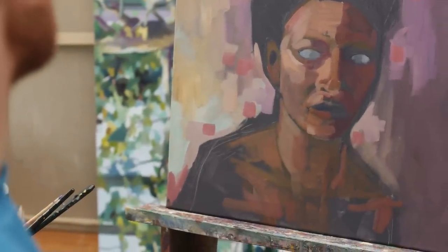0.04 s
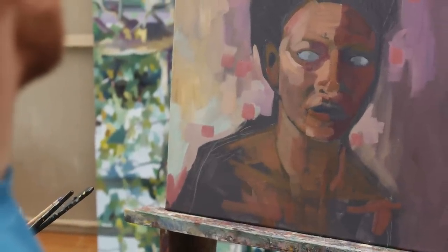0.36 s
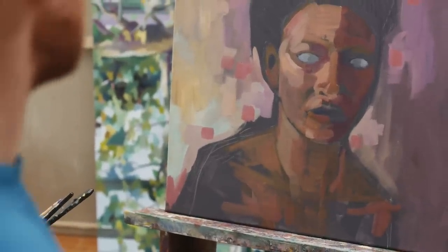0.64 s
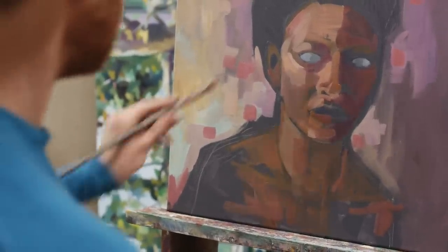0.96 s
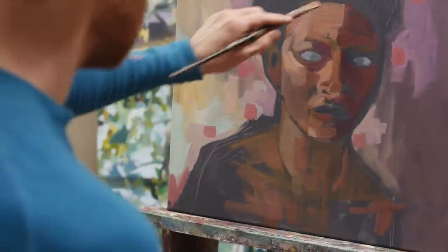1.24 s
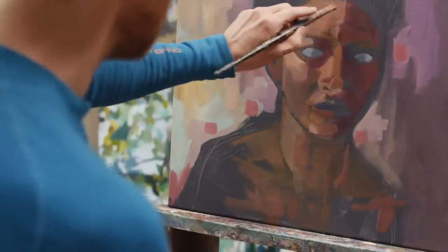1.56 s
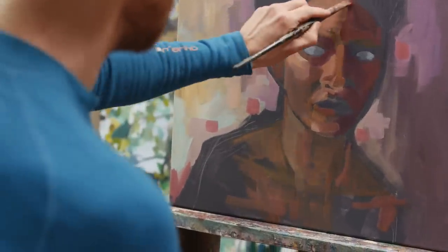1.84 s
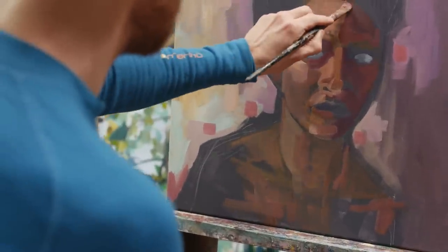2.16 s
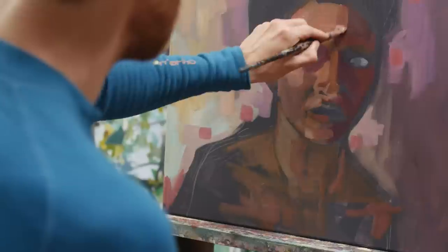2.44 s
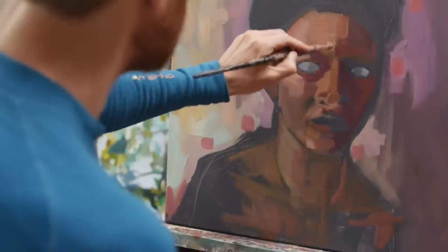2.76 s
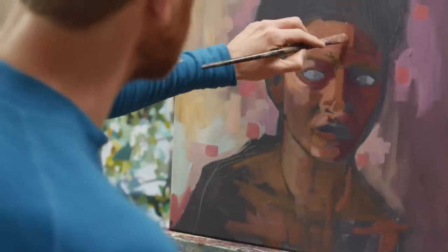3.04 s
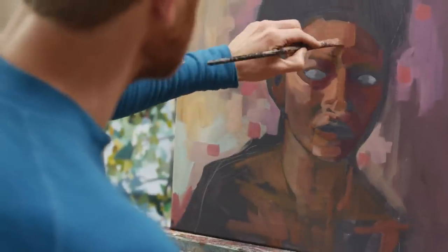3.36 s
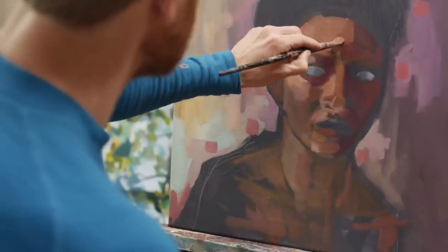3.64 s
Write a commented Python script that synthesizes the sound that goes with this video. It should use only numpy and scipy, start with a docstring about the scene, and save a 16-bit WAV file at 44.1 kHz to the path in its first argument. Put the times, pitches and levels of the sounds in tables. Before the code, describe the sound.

Quick paired knocks of a brush being rinsed in a jar fade into a small slosh and a cloth rustle. Very soft bristle strokes on canvas follow in a quiet room, with a few easel bumps and low microphone rumble.

```python
"""A painter knocks a brush to and fro in a rinsing jar, a hard knock and a lighter one each time:
each impact excites damped modes of handle and jar, and the table thumps beneath them.
The liquid slops and a sleeve rustles as the arm lifts to the easel, with a few dull bumps.
Then soft bristle strokes cross the canvas, sounding by friction, and a dull background noise swells.
From the lift onward low rumbles buffet the two microphones unevenly; the small room stays quiet."""
import sys
import numpy as np
from scipy import signal
from scipy.fft import rfft, irfft
from scipy.io import wavfile

SR = 44100
rng = np.random.default_rng(int(sys.argv[2]) if len(sys.argv) > 2 else 0)


def waveform_to_disk(signal):
    """Save audio, clipped to [-1, 1], as 16-bit WAV at the path in sys.argv[1]."""
    frames = np.transpose(np.atleast_2d(signal))
    scaled = np.clip(frames, -1, 1) * 32767
    samples = np.round(scaled).astype(np.int16)
    wavfile.write(sys.argv[1], SR, samples)


N = 171990


def amp(db):
    """Amplitude ratio of a level in decibels."""
    return 10 ** (np.asarray(db) / 20)


def unit_rms(x):
    """Normalisation to unit root-mean-square amplitude."""
    return x / np.sqrt(np.mean(x ** 2) + 1e-20)


def at_frequency(points, hz):
    """Interpolation of a table on a logarithmic frequency axis."""
    f, value = np.transpose(points)
    return np.interp(np.log(hz + 1), np.log(f + 1), value)


def envelope(points):
    """Amplitude envelope interpolated in decibels, silent outside the table's span."""
    times, db = np.transpose(points)
    return amp(np.interp(np.arange(N) / SR, times, db, left=-200, right=-200))


def add(mix, start, sound):
    """Superposition of a sound on the mix, from a start time in seconds."""
    part = mix[..., max(round(start * SR), 0):][..., :sound.shape[-1]]
    part += sound[..., :part.shape[-1]]


def shaped(x, spectrum):
    """Zero-phase filtering by a spectrum table."""
    n = x.shape[-1]
    return irfft(rfft(x) * amp(at_frequency(spectrum, np.fft.rfftfreq(n, 1 / SR))), n)


def impulse(spectrum, size=4096):
    """Minimum-phase impulse response with the given spectrum, peak 1."""
    log_gain = np.log(amp(at_frequency(spectrum, abs(np.fft.fftfreq(size, 1 / SR)))))
    response = np.exp(np.conj(signal.hilbert(log_gain)))
    pulse = np.fft.ifft(response).real[:size // 2]
    return pulse / abs(pulse).max()


def mode(hz, bandwidth_hz):
    """Free vibration of a damped oscillator, peak 1."""
    t = np.arange(SR // 5) / SR
    ring = np.exp(-np.pi * bandwidth_hz * t) * np.sin(2 * np.pi * hz * t)
    return ring / abs(ring).max()


def shot_noise(events_per_s=5000):
    """Shot noise: dense, independent impulses of random size."""
    return rng.standard_normal(N) * (rng.random(N) < events_per_s / SR)


def grainy_noise(spectrum):
    """Filtered shot noise at unit rms."""
    return unit_rms(shaped(shot_noise(), spectrum))


# Hard knocks on the jar's near side and light return knocks on its far side
# (t/s, jar level/dB, thump level/dB, tick level/dB, tick f/Hz, contact cutoff f/Hz)
NEAR_KNOCKS = [(.1488, -16, -27, -23.5, 4200, 5950), (.4240, -12.5, -25.5, -22.5, 5000, 5100),
               (.6878, -11.5, -25.5, -20.5, 5330, 5760), (.9411, -21, -29, -32.5, 4900, 1200),
               (1.2801, -29, -32.5, -36.5, 4490, 1580)]
FAR_KNOCKS = [(.2543, -16.5, -30, -40.5, 3770, 9500), (.5419, -17.5, -30, -38, 4030, 9450),
              (.8101, -15, -31, -35.5, 3660, 9500), (1.0893, -28, -38.5, -41, 3970, 3000)]
# Spectrum of each side's heavily damped ring (f/Hz, level/dB)
NEAR_SPECTRUM = [(80, -34.5), (200, -7), (260, -1.5), (350, -7), (420, -14), (560, 3), (780, -1.5),
                 (1000, -2), (1350, -13), (1650, -8), (2350, -34.5), (3200, -28), (8500, -32.5),
                 (15000, -65)]
FAR_SPECTRUM = [(80, -35.5), (200, -10.5), (300, 2.5), (420, -15), (700, -4.5), (950, 3), (1300, -3.5),
                (1650, -2.5), (2100, -17), (6500, -13.5), (15000, -48)]
# Faint, lingering modes of the jar (f/Hz, level/dB re the knock, T60/s)
LINGERING_MODES = [(259.4, -31.5, 0.27), (584, -59, 0.16), (646, -33, 0.11), (777, -36.5, 0.27)]
# Modes of the handle (ratio to the tick frequency, level/dB, bandwidth/Hz)
HANDLE_MODES = [(1, 0, 1250), (1.68, -6, 900), (2.4, -19, 1200)]
# Spectrum of the handle's chatter on the rim (f/Hz, level/dB)
CHATTER_SPECTRUM = [(500, -20), (2500, -2), (6000, 0), (15000, 2)]


def jar_knocks(knocks, jar_spectrum, chatter_re_tick_db, chatter_decay_s):
    """Impact excitation: the handle ticks and chatters on the rim, the jar rings, the table thumps."""
    thump_hz, thump_peak_s = 120.2, 0.0061
    tick_lag_s, thump_lag_s = 0.0003, 0.0023
    out, t = np.zeros(N), np.arange(SR // 10) / SR
    jar = impulse(jar_spectrum)
    linger = sum(amp(db) * mode(hz, np.log(1000) / np.pi / t60) for hz, db, t60 in LINGERING_MODES)
    rise = t / thump_peak_s
    thump = (rise * np.exp(1 - rise)) ** 2 * np.sin(2 * np.pi * thump_hz * t)
    for start, jar_db, thump_db, tick_db, tick_hz, cutoff_hz in knocks:
        tick = sum((-1) ** i * amp(db) * mode(tick_hz * ratio, bandwidth)
                   for i, (ratio, db, bandwidth) in enumerate(HANDLE_MODES))
        chatter = unit_rms(shaped(rng.standard_normal(len(t)), CHATTER_SPECTRUM))
        chatter *= np.exp(-t / chatter_decay_s)
        contact = signal.butter(2, cutoff_hz, fs=SR)  # a softer contact passes less treble
        add(out, start, amp(jar_db) * signal.lfilter(*contact, jar))
        add(out, start, amp(jar_db) * linger)
        add(out, start, amp(tick_db + chatter_re_tick_db) * signal.lfilter(*contact, chatter))
        add(out, start + tick_lag_s, amp(tick_db) * tick)
        add(out, start + thump_lag_s, amp(thump_db) * thump)
    return out


# One swish as the arm lifts, then strokes on the canvas (t/s, duration/s, level/dB, treble gain/dB)
BRUSH_STROKES = [(1.033, 0.096, -54, -5), (2.29, 0.2, -60.5, -1), (2.472, 0.085, -62.5, 1),
                 (3.176, 0.19, -61.5, -5), (3.66, .145, -57.5, 3.5)]
# Spectrum of bristles on the weave (f/Hz, level/dB)
BRISTLE_SPECTRUM = [(900, -7), (2600, -16), (4300, -3), (7200, 0), (10000, -9), (11800, -1), (13600, -4),
                    (16000, -15)]
# Flicks of single bristles (t/s, peak level/dB) and their spectrum (f/Hz, level/dB)
BRISTLE_FLICKS = [(1.956, -41), (3.1824, -38.5), (3.204, -33.5), (3.841, -41), (3.8745, -44)]
FLICK_SPECTRUM = [(2500, -18), (7500, -1), (10000, -19), (12500, 2), (16000, -21)]


def brush_strokes(rise_s=0.039, fall_s=0.049, treble_hz=10500):
    """Stick-slip friction: bristles slip over the weave in short strokes, and a few flick free."""
    out, t = np.zeros(N), np.arange(N) / SR
    friction = grainy_noise(BRISTLE_SPECTRUM)
    treble = signal.sosfiltfilt(signal.butter(3, treble_hz, "high", fs=SR, output="sos"), friction)
    for start, duration, db, treble_db in BRUSH_STROKES:
        pressure = np.clip(np.minimum((t - start) / rise_s, (start + duration - t) / fall_s), 0, 1)
        out += amp(db) * pressure * (friction + (amp(treble_db) - 1) * treble)
    flick = impulse(FLICK_SPECTRUM)
    for start, db in BRISTLE_FLICKS:
        add(out, start, amp(db) * flick)
    return out


# Tail of a knock, then sloshing: envelope (t/s, level/dB) and spectrum (f/Hz, level/dB)
TAIL_AND_SLOSH_LEVELS = [(0, -51.5), (.15, -63.5), (.75, -52.5), (.968, -58), (.976, -36.5), (1.03, -44.5),
                         (1.12, -52), (1.4, -60)]
TAIL_AND_SLOSH_SPECTRUM = [(60, -11), (150, -3), (270, -2.5), (500, -6.5), (1000, -14.5), (1450, -18),
                           (2400, -24.5), (6000, -58)]


def knock_tail_and_slosh():
    """Decay and sloshing: the fading tail of an earlier knock, then low sloshing in the jar."""
    return envelope(TAIL_AND_SLOSH_LEVELS) * grainy_noise(TAIL_AND_SLOSH_SPECTRUM)


# Rustle of the sleeve: envelope (t/s, level/dB) and spectrum (f/Hz, level/dB)
SLEEVE_LEVELS = [(0, -71), (.2, -67), (.4, -57), (.62, -52.5), (.78, -54.5), (.9, -56.5), (1.0, -56),
                 (1.07, -54), (1.15, -55), (1.3, -56), (1.42, -61), (1.8, -66.5)]
SLEEVE_SPECTRUM = [(100, 13), (600, 5), (1600, 4), (2900, 3.5), (6000, 2), (10000, -3), (15500, -10.5)]
# Envelope of a hiss within the rustle (t/s, level/dB)
HISS_LEVELS = [(.68, -77), (.85, -60), (1.05, -61.5), (1.25, -67.5), (1.36, -69)]


def sleeve_rustle(hiss_hz=4405, bandwidth_hz=580, fall_hz_per_s=480):
    """Cloth friction: tiny slips sum to broadband noise, with a narrow hiss that sinks in pitch."""
    since_onset = np.arange(N) / SR - HISS_LEVELS[0][0]
    centre_hz = hiss_hz - fall_hz_per_s * since_onset
    lowpass = signal.butter(2, bandwidth_hz / 2, fs=SR)
    baseband = signal.lfilter(*lowpass, shot_noise() + 1j * shot_noise())
    hiss = (baseband * np.exp(2j * np.pi * np.cumsum(centre_hz) / SR)).real
    rustle = envelope(SLEEVE_LEVELS) * grainy_noise(SLEEVE_SPECTRUM)
    return rustle + envelope(HISS_LEVELS) * unit_rms(hiss)


# Bumps of the easel and gear (t/s, level/dB, f/Hz, microphone mount level/dB)
EASEL_BUMPS = [(0.972, -31, 676, -49), (1.3784, -29.5, 523, -32), (2.317, -34, 216, -47),
               (2.719, -39, 412, -46), (3.448, -39.5, 440, -46)]


def easel_bumps(bandwidth_hz=210):
    """Soft impact: a smooth force pulse drives one low, damped resonance."""
    out, force = np.zeros(N), signal.windows.hann(36)
    for start, db, hz, _ in EASEL_BUMPS:
        add(out, start, amp(db) * np.convolve(mode(hz, bandwidth_hz), force / force.sum()))
    return out


# Modes of the microphone mount (f/Hz, level/dB, bandwidth/Hz) and rubbing on it (t/s, level/dB)
MOUNT_RESONANCES = [(260, 3.5, 37), (815, -9.5, 150)]
MOUNT_RUB_LEVELS = [(2.65, -67), (3.05, -48), (3.3, -69), (3.9, -70.5)]


def mount_vibration():
    """Structure-borne sound: bumps and rubbing rock the mount, moving the microphones in antiphase."""
    ring = sum(amp(db) * mode(hz, bandwidth) for hz, db, bandwidth in MOUNT_RESONANCES)
    rubbing = signal.fftconvolve(shot_noise(), ring)[:N]
    sway = envelope(MOUNT_RUB_LEVELS) * unit_rms(rubbing)
    for start, *_, mount_db in EASEL_BUMPS:
        add(sway, start, amp(mount_db) * ring)
    return np.array([sway, -sway])


# Buffets on the microphones (peak t/s, half-width/s, left level/dB, right level/dB, swing f/Hz)
PRESSURE_BUFFETS = [(.95, 0.057, -59, -27.5, 26), (1.05, 0.049, -52, -27, 45.6),
                    (1.64, 0.059, -30, -32.5, 25), (1.78, 0.038, -29.5, -29.5, 12.5),
                    (1.951, 0.057, -28.5, -28, 28), (2.21, 0.06, -48, -30.5, 42.6),
                    (2.368, 0.044, -41, -24, 45), (2.77, 0.12, -32, -32.5, 18.1),
                    (3.42, 0.26, -49.5, -36, 27.6)]
# Spectrum of a buffet swinging at the reference frequency (f/Hz, level/dB)
BUFFET_SPECTRUM = [(8, -6), (28, -1), (45, -13.5), (72, -20), (140, -41.5), (400, -49.5), (3000, -120)]


def buffet_rumble(reference_hz=30):
    """Incoherent pressure fluctuations: slow swings swell and fade, unrelated at the two microphones."""
    out, t = np.zeros((2, N)), np.arange(N) / SR
    for peak_s, width_s, left_db, right_db, swing_hz in PRESSURE_BUFFETS:
        spectrum = [(hz * swing_hz / reference_hz, db) for hz, db in BUFFET_SPECTRUM]
        swings = shaped(rng.standard_normal((2, N)), spectrum)
        swell = 1 / np.cosh((t - peak_s) / width_s)
        swell_rms = np.sqrt(np.mean(swell ** 2))
        for channel, db, swing in zip(out, (left_db, right_db), swings):
            channel += amp(db) * swell_rms * unit_rms(swell * swing)
    return out


# Dull midrange noise: envelope (t/s, level/dB) and spectrum (f/Hz, level/dB)
MIDRANGE_LEVELS = [(2.28, -67), (2.32, -55), (2.75, -75), (3.0, -58.5), (3.12, -55.5), (3.45, -61),
                   (3.65, -56), (4, -59)]
MIDRANGE_SPECTRUM = [(170, 6.5), (350, -1.5), (800, 2), (1100, -3), (2000, -14.5), (15000, -19)]


def midrange_noise():
    """Modulated noise: a brief, dull rub with the first stroke, then a background swell from 3 s."""
    return envelope(MIDRANGE_LEVELS) * grainy_noise(MIDRANGE_SPECTRUM)


# Reverberation time (f/Hz, T60/s), spectrum of the tail (f/Hz, level/dB), reflections (t/s, level/dB)
REVERB_TIMES = [(100, 2), (500, 0.76), (1500, 0.33), (12000, 0.3)]
REVERB_SPECTRUM = [(100, -23.5), (450, -10), (950, -15), (1700, -9), (4000, -9), (12000, -15)]
EARLY_REFLECTIONS = [(0.0115, -20)]


def reverberation(source, build_s=0.0041):
    """Room response: an early reflection and a diffuse field that decays fastest in the treble."""
    hz, t, bands = signal.stft(rng.standard_normal(SR), SR, nperseg=256)
    decay = amp(-60 * t / at_frequency(REVERB_TIMES, hz)[:, None])
    _, tail = signal.istft(bands * decay, SR, nperseg=256)
    tail *= np.minimum(np.arange(len(tail)) / SR / build_s, 1)
    response = shaped(tail / np.linalg.norm(tail), REVERB_SPECTRUM)[:SR // 2]
    for delay, db in EARLY_REFLECTIONS:
        add(response, delay, amp([db]))
    return signal.fftconvolve(source, response)[:N]


# Room tone: spectrum (f/Hz, level/dB) and left-right correlation (f/Hz, coefficient 0-1)
AMBIENT_SPECTRUM = [(15, 16.98), (50, 2.7), (100, 1), (175, 0), (230, -4), (420, -11), (800, -11),
                    (1150, -10), (2000, -19), (3200, -24), (5200, -21), (10000, -23), (15500, -31)]
AMBIENT_CORRELATION = [(50, .3), (200, .85), (1000, .96), (3000, .88), (14000, .85)]


def room_tone(noise_db=-50, hum_db=-73, hum_hz=177.5, hum_bandwidth_hz=3.4):
    """Partial coherence: ambient noise, nearly alike on both sides above the bass, and a faint hum."""
    correlation = at_frequency(AMBIENT_CORRELATION, np.fft.rfftfreq(N, 1 / SR))
    mid, side = rfft(rng.standard_normal((2, N)))
    mid, side = mid * np.sqrt(1 + correlation), side * np.sqrt(1 - correlation)
    noise = shaped(irfft([mid + side, mid - side], N), AMBIENT_SPECTRUM)
    hum = signal.fftconvolve(rng.standard_normal(N), mode(hum_hz, hum_bandwidth_hz))[:N]
    return amp(noise_db) * unit_rms(noise) + amp(hum_db) * unit_rms(hum)


def scene():
    """Superposition: only the mount, the rumble and the room tone differ between left and right."""
    hard = jar_knocks(NEAR_KNOCKS, NEAR_SPECTRUM, chatter_re_tick_db=-1.5, chatter_decay_s=0.0018)
    light = jar_knocks(FAR_KNOCKS, FAR_SPECTRUM, chatter_re_tick_db=3, chatter_decay_s=0.0029)
    impacts = hard + light + easel_bumps()
    centre = impacts + brush_strokes() + midrange_noise() + knock_tail_and_slosh() + sleeve_rustle()
    return centre + mount_vibration() + buffet_rumble() + reverberation(impacts) + room_tone()


def record(dry):
    """Band limiting: a linear-phase low-pass filter removes the highest treble."""
    cutoff_hz = 15850
    lowpass = signal.firwin(511, cutoff_hz, window=("kaiser", 9), fs=SR)
    return signal.oaconvolve(dry, lowpass[None], "same")


dry = scene()
out = record(dry)
waveform_to_disk(out)
```